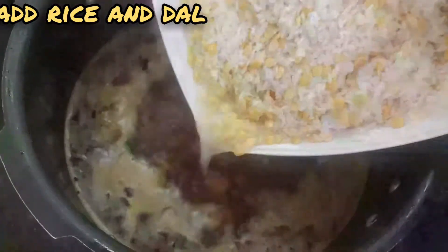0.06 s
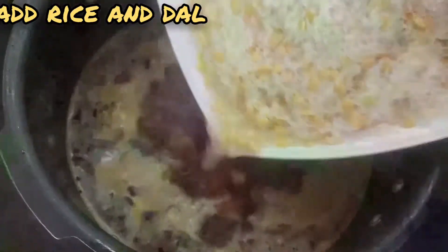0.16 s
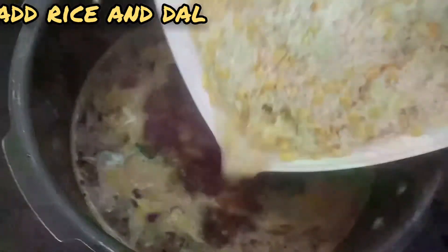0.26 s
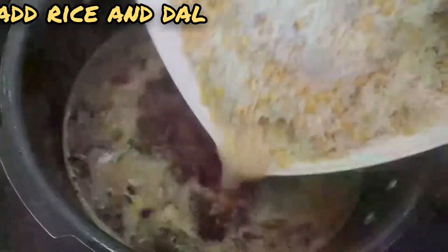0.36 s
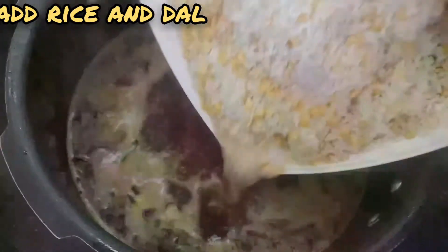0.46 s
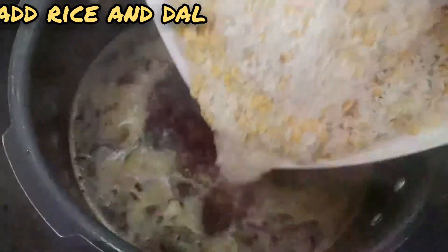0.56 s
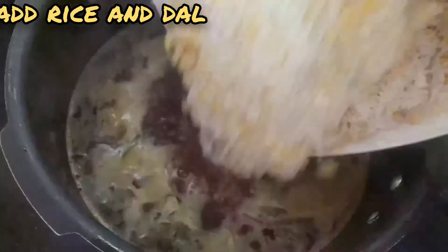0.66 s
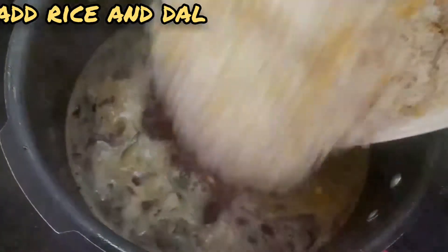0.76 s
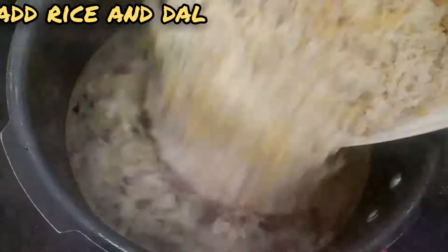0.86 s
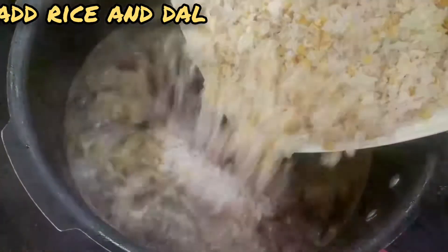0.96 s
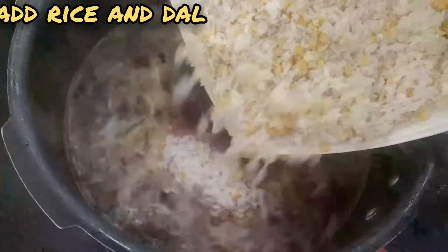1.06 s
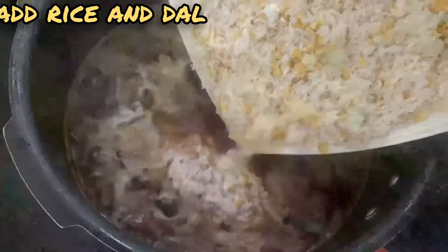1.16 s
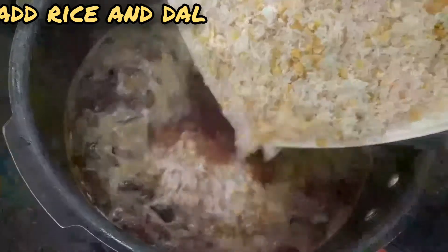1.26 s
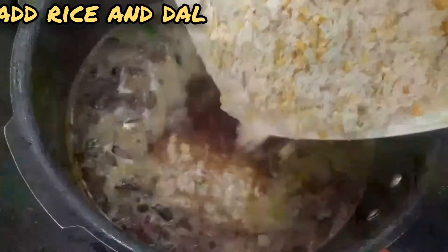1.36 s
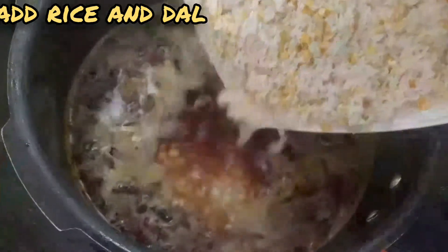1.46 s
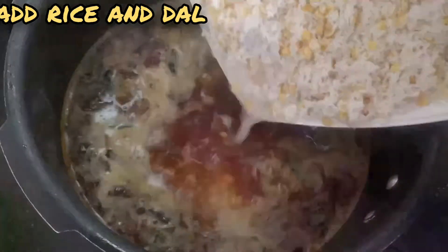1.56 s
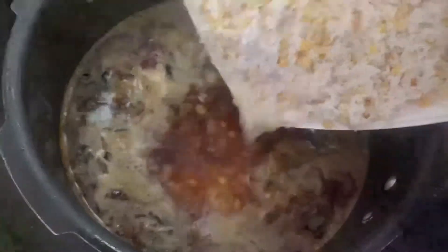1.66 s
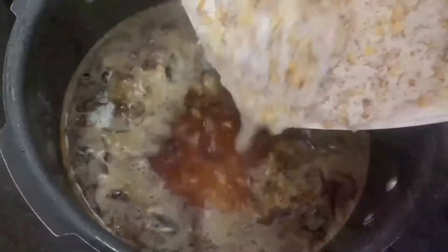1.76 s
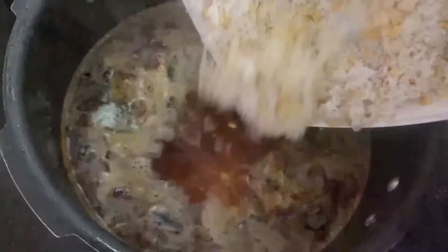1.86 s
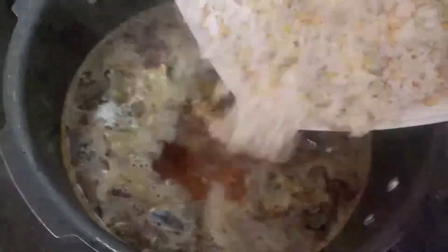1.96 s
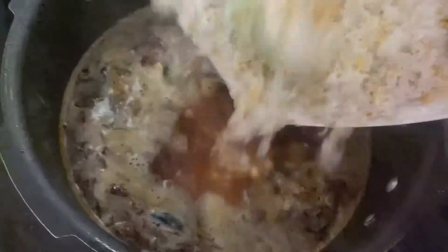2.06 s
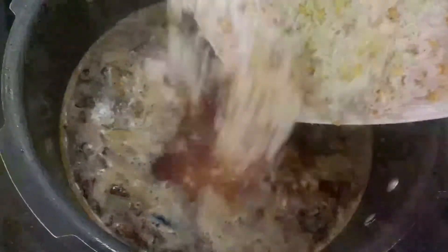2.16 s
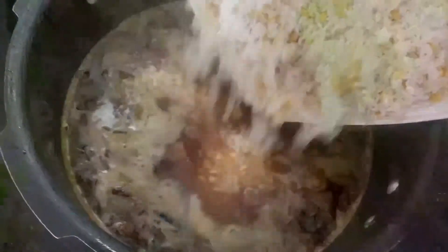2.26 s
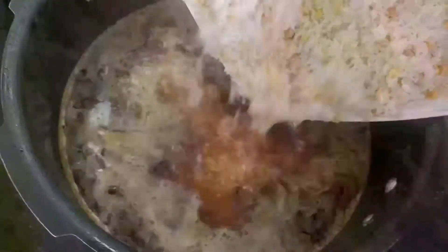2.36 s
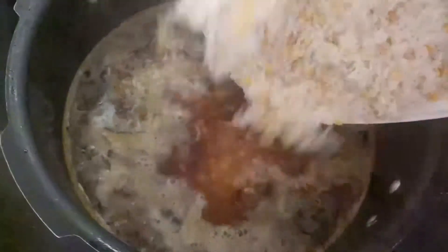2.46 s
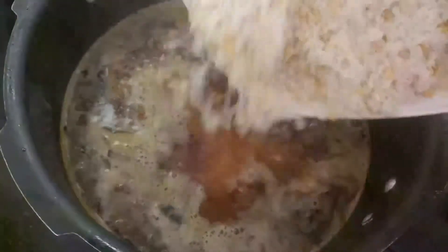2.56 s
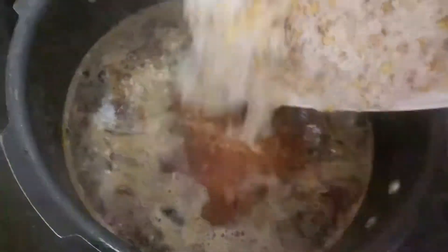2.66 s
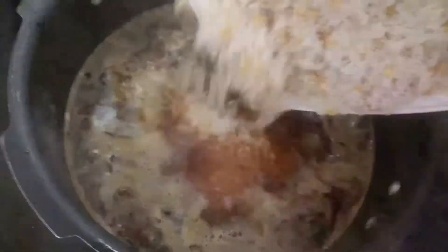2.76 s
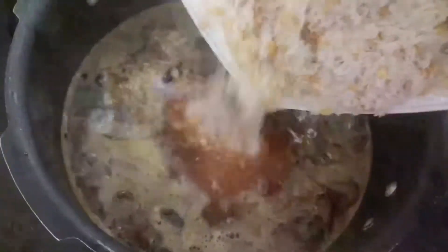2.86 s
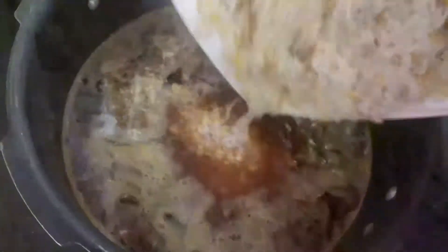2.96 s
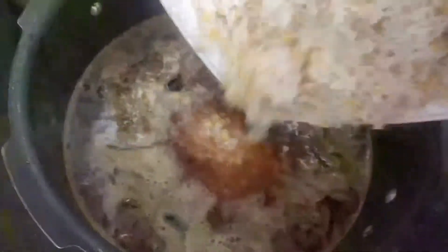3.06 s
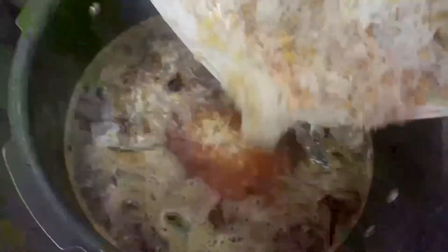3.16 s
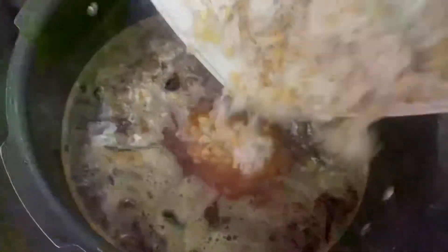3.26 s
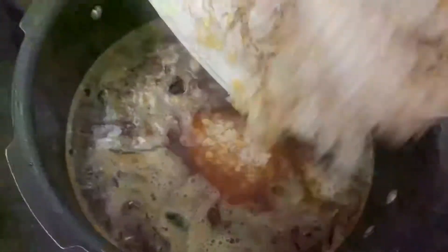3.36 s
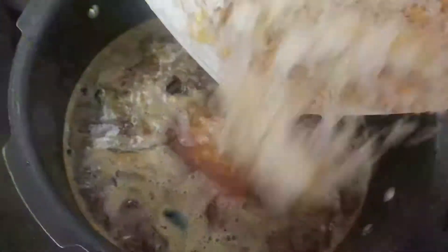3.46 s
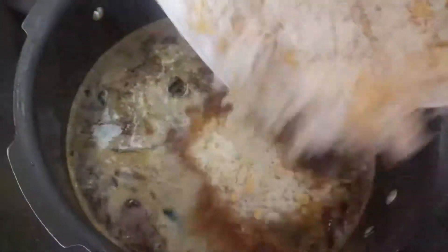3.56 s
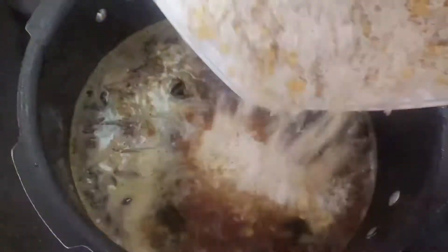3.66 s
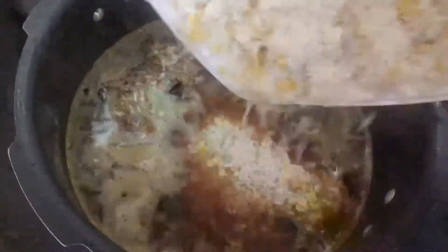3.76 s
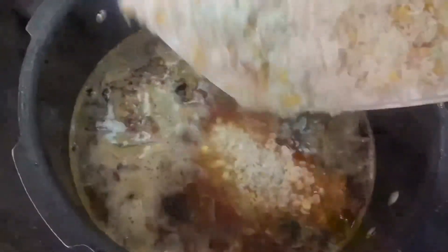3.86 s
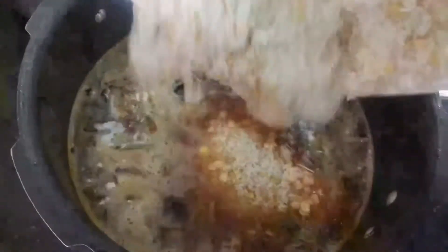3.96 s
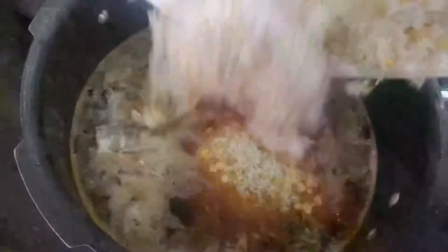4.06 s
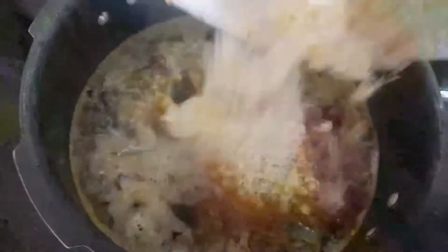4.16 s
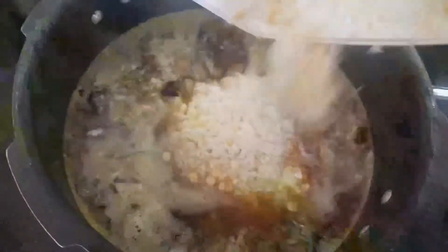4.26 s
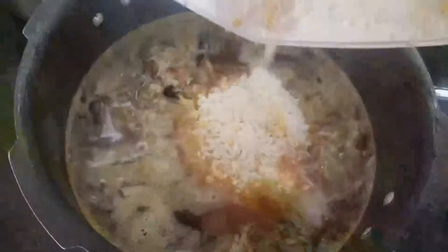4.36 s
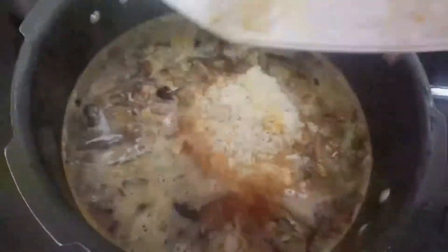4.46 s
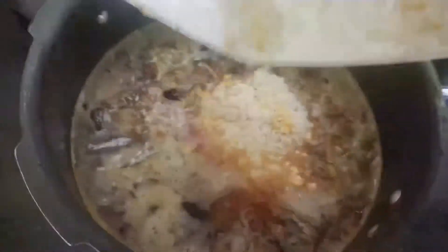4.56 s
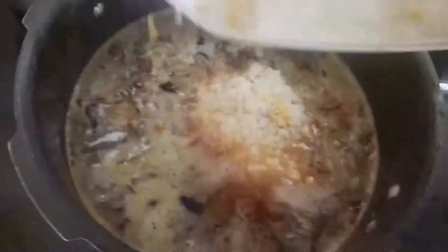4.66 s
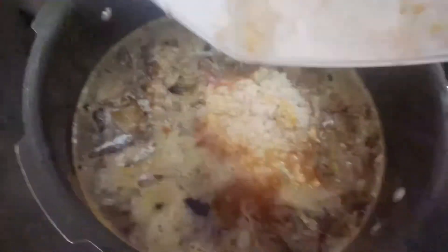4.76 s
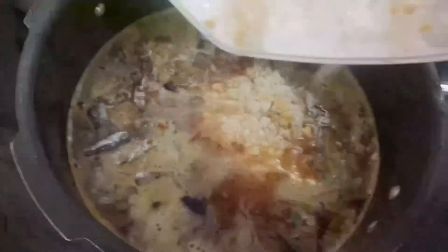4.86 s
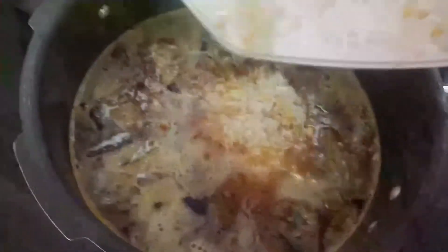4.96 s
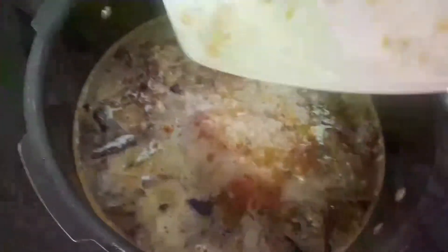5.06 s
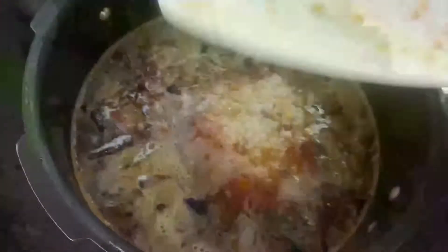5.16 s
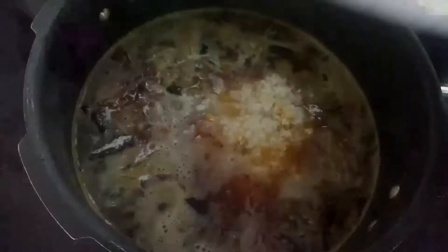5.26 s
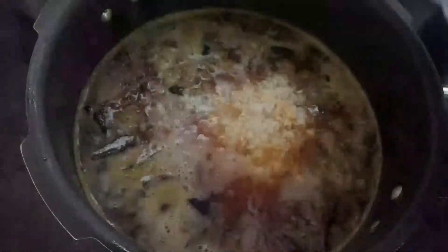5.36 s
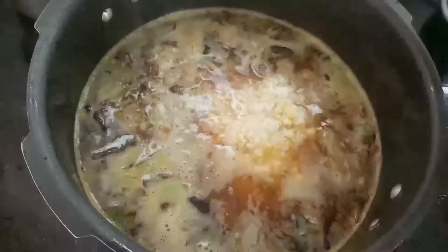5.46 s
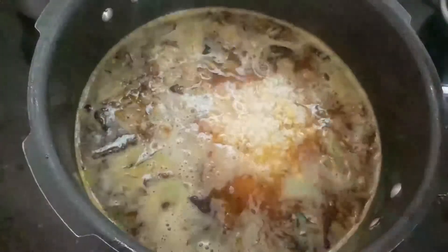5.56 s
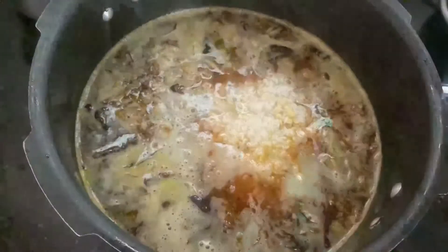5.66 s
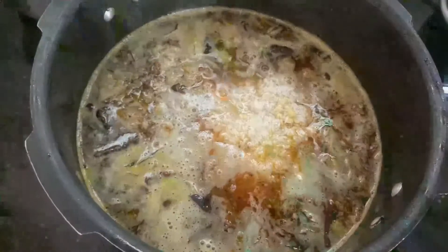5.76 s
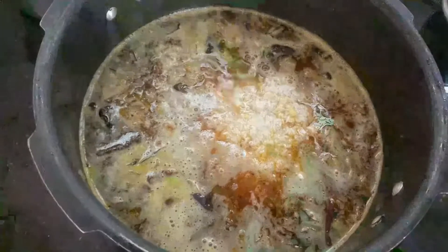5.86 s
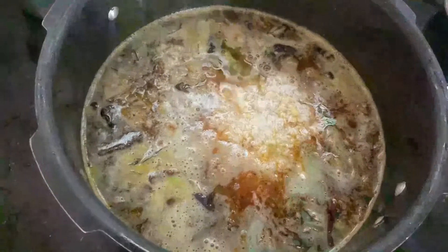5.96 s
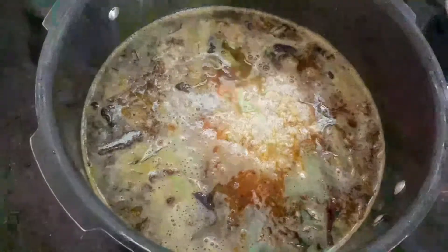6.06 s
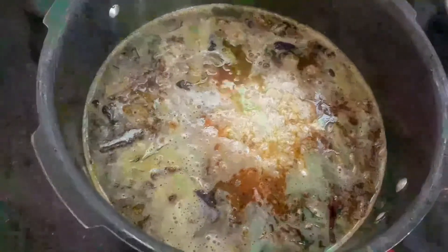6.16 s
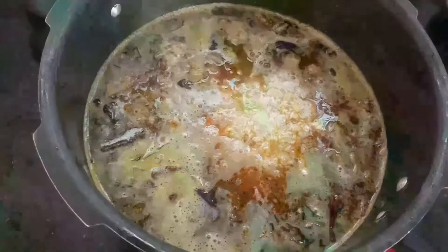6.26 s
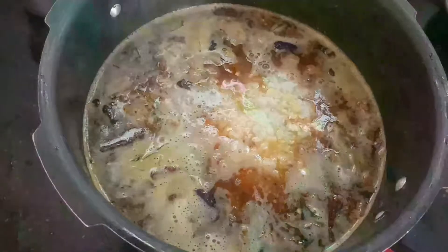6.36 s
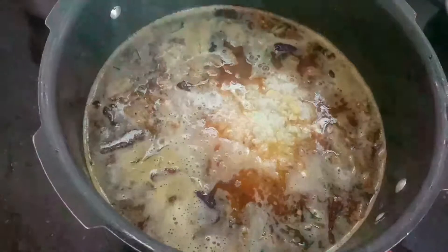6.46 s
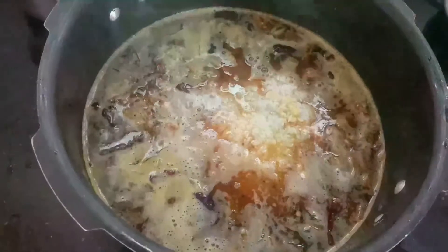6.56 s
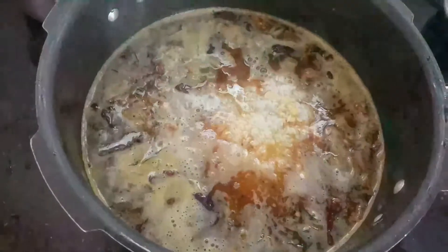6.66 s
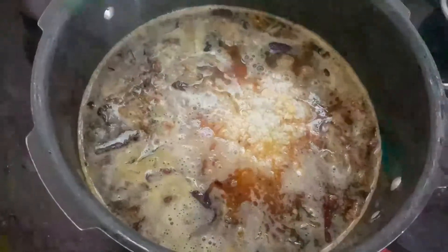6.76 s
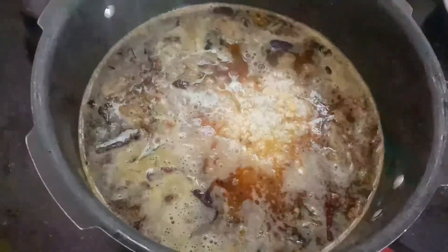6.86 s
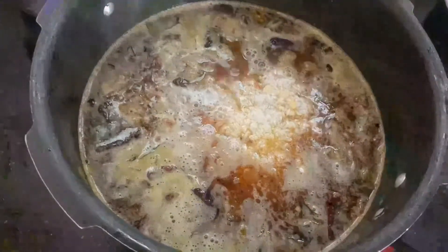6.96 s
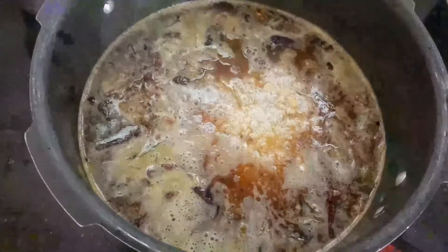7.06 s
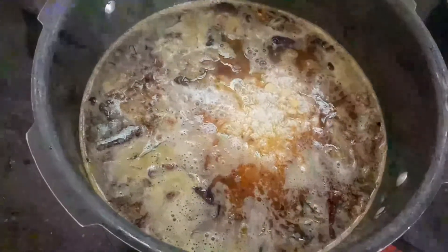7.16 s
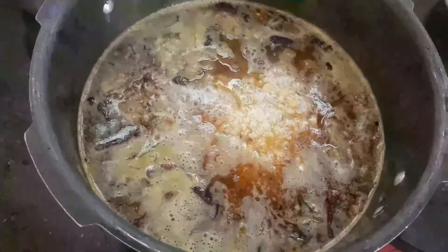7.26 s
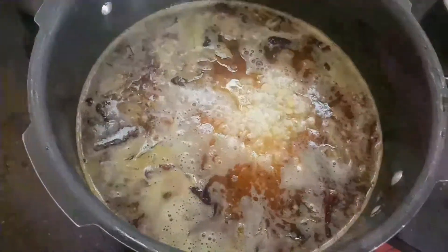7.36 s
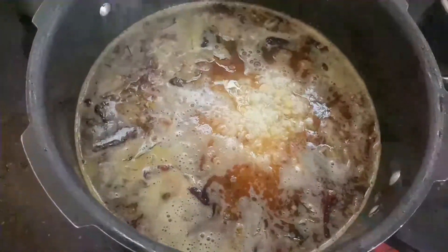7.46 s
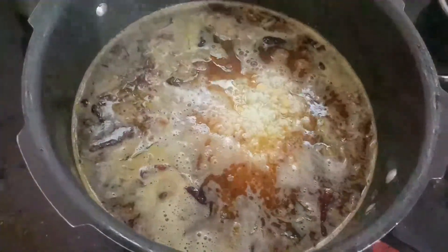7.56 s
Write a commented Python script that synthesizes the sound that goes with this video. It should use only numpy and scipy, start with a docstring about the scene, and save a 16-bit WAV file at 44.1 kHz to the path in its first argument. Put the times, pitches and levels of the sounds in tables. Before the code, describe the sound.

In a small tiled kitchen, close to a phone, wet rice and lentils patter into a simmering metal pot in uneven clumps with hiss, light splash and spray. Four sharp hand taps crack on the plastic tray, heavier rushes follow, and a softer tap comes once it is empty. Soft burner roar and bubbling remain until the tray slaps hard onto the counter, ringing briefly.

```python
"""In a small tiled kitchen, soaked rice and lentils slide off a plastic tray into a simmering steel pot.
Wet grains, random impacts ringing at many pitches, patter in clumps over hiss, splash and spray, close under a phone.
A hand taps the tray four times and once more when it is empty, as bursts of coloured noise with short resonances.
Then the tray is set down on the counter with a slap, a thud and ringing modes.
The burner and the kitchen hum underneath, made of noise in flickering bands, with bubbles and a thin whine."""
import sys
import numpy as np
from scipy import signal
from scipy.fft import rfft, irfft
from scipy.io import wavfile
from scipy.ndimage import uniform_filter1d

SR = 44100
rng = np.random.default_rng(int(sys.argv[2]) if len(sys.argv) > 2 else 0)


def persist_wave(psi):
    """Save psi, clipped to +-1, as 16-bit WAV."""
    counts = np.round(np.clip(psi, -1, 1) * 32767).astype(np.int16)
    wavfile.write(sys.argv[1], SR, np.atleast_2d(counts).T)


N = 335909  # length in samples
ROOM_T60_S, POT_T60_S = 0.32, 0.12


def undb(db):
    """Decibels to linear gain."""
    return 10 ** (np.asarray(db) / 20)


def level(x, db):
    """Set the RMS level in dB."""
    return x * undb(db) / np.sqrt(np.mean(x ** 2))


def colour(x, table, size=2048):
    """Causal filter whose gain follows (Hz, dB) points, from the folded cepstrum."""
    hz, db = np.transpose(table)
    f = np.maximum(np.arange(size // 2 + 1) * SR / size, 1)
    gain_db = np.interp(np.log(f), np.log(np.maximum(hz, 1)), db)
    cep = irfft(np.log(undb(gain_db)))
    # folding the cepstrum puts all the energy after the onset
    cep[1:size // 2] *= 2
    cep[size // 2 + 1:] = 0
    impulse = irfft(np.exp(rfft(cep)))
    return signal.fftconvolve(x, impulse)[:len(x)]


def peak(hz, width, skirt_db):
    """A broad resonance as (Hz, dB) points; width is a share of the centre."""
    low_side = [(hz / 8, skirt_db - 21.0), (hz / (1 + 2 * width), skirt_db)]
    high_side = [(hz * (1 + 2 * width), skirt_db), (hz * 8, skirt_db - 27.5)]
    return low_side + [(hz, 0)] + high_side


def walk(rate):
    """Random levels held 1 / rate s and slewed twice; spread near 1.4."""
    k = int(SR / rate)
    steps = np.repeat(rng.standard_normal(N // k + 1), k)
    return 1.9 * uniform_filter1d(uniform_filter1d(steps, k), k)[:N]


def fade(t60, t):
    """Exponential decay, down 60 dB after t60 seconds."""
    return np.exp(-np.log(1000) * t / t60)


def gate(t, start, end, swell, fall):
    """Gain 1 from start to end, 20 dB less one swell before and one fall after."""
    before, after = (start - t) / max(swell, .01), (t - end) / max(fall, .01)
    return undb(-20 * np.maximum(np.maximum(before, after), 0))


def add(out, s, x):
    """Mix a sound in at time s."""
    i = int(s * SR)
    out[i:i + len(x)] += x[:N - i]


def burst(table, t60, peak_db, t, rise=0.001115, blow=0.):
    """A coloured noise crack that swells and dies away; blow adds one clean push at the top of the swell."""
    shake = rng.standard_normal(len(t)) * fade(t60, t) * np.clip(t / rise, 0, 1) ** 2
    shake[int(rise * SR)] += blow * np.sqrt(np.sum(shake ** 2))
    # small things radiate no deep bass
    bass_cut = (table[0][0] / 4, table[0][1] - 36)
    x = colour(shake, [bass_cut] + list(table))
    # the peak is taken as three times the RMS of the opening
    opening = x[:int((rise + t60 / 8) * SR)]
    return x * undb(peak_db) / (3 * np.sqrt(np.mean(opening ** 2)))


def ring(modes, db, t):
    """Modes set going together by one blow; close pairs beat."""
    x = sum(undb(g) * np.sin(2 * np.pi * hz * t) * fade(t60, t) for hz, g, t60 in modes)
    return undb(db) * x * np.clip(t / 0.0019, 0, 1)


def room(x, wet_db, t60=ROOM_T60_S):
    """The small tiled kitchen, or the pot, answers with a dense short tail."""
    t = np.arange(int(.45 * SR)) / SR
    tail = rng.standard_normal(len(t)) * fade(t60, t) * np.clip(t / 0.0015, 0, 1)
    tail = tail / np.sqrt(np.sum(tail ** 2))
    return x + undb(wet_db) * signal.fftconvolve(x, tail)[:N]


def grains(rate, spread_db, clump_db, clump_rate):
    """Random impacts of spread-out sizes, rate per second, swelling in clumps."""
    hit = rng.random(N) < rate / SR
    size = undb(spread_db * np.minimum(rng.exponential(size=N), 3)) * rng.uniform(-1, 1, N)
    return hit * size * undb(clump_db * walk(clump_rate))


def pings(lo_hz, hi_hz, rate, width, clump_db, clump_rate, count=9):
    """Grains or bubbles of many sizes: each size rings a few cycles at its own pitch and clumps on its own."""
    out = 0
    for hz in np.geomspace(lo_hz, hi_hz, count):
        struck = colour(grains(rate, 1.6, clump_db, clump_rate), peak(hz, width, -9.5))
        out = out + level(struck, 0) * np.sqrt(hz / hi_hz)
    return out


# Tone of the burner's roar. Each row: frequency in Hz, relative level in dB per Hz.
ROAR_TONE = [(15, -20), (25, -9), (54, -5.5), (105, -11.5), (140, -1.5), (170, -14), (218, -12.5),
             (280, -11.5), (341, -5.5), (390, -12), (600, -15), (750, -21), (950, -18.5), (1220, -23.5),
             (1500, -54), (2500, -57)]
# Tone of the air. Each row: frequency in Hz, relative level in dB per Hz.
AIR_TONE = [(900, -25), (1400, -1), (2300, 0), (3400, -5), (4200, -3), (5500, -5), (8000, -5), (9900, -20),
            (12500, -14), (16000, -14)]
# Swell of the flame, heard against its own mean. Each row: time in seconds, level in dB.
FLAME_SWELL = [(0.0, -59), (0.87, -53.5), (1.72, -55), (2.37, -54), (3.4, -59.5), (4.11, -53),
               (4.65, -57.5), (5.0, -54), (6.07, -55.5), (6.77, -59), (7.0, -52.5), (7.21, -65.5),
               (7.49, -53.5), (7.62, -58.5)]
ROAR_DB, AIR_DB = -55, -63  # RMS before swell and flicker
WHINE_HZ, WHINE_DB = 14700, -84  # RMS before it wavers
FIZZ_DB, FIZZ_START_S, FIZZ_END_S = -63.5, 5.73, 5.86  # the broth fizzes up round the heap for a moment


def kitchen():
    """Flame roar and air in bands that flicker alone, simmer fizz and bubbles, and a thin wavering whine."""
    t, f = np.arange(N) / SR, np.arange(N // 2 + 1) * SR / N
    roar = level(colour(rng.standard_normal(N), ROAR_TONE, size=8192), ROAR_DB)
    air = level(colour(rng.standard_normal(N), AIR_TONE), AIR_DB)
    spec = rfft(roar + air)

    s, roar_db = np.transpose(FLAME_SWELL)
    swell_db = np.interp(t, s, roar_db - roar_db.mean())
    bed, flicker_db, drift_db = 0, 1.3, 0.7
    for lo in 16 * 2 ** np.arange(0, 10, .5):  # half-octave bands
        band = irfft(spec * (f >= lo) * (f < lo * np.sqrt(2)), N)
        flame_db = swell_db * np.clip(1500.0 / lo, 0, 1)  # the flame moves the bass most
        bed = bed + band * undb(flame_db + flicker_db * walk(9.) + drift_db * walk(1.445))

    fizz = room(pings(3760., 10300., 300., 0.3, 2.5, 14.), -1.9)
    fizz = level(colour(fizz, PATTER_TONE[:-2] + SPRAY_TONE[1:]), -1.5)
    fizz = fizz * undb(FIZZ_DB) * gate(t, FIZZ_START_S, FIZZ_END_S, 0.3, 0.58)
    bubbles = level(room(pings(550., 1300., 80., .12, 1.2, 6., count=7), -3.0), -66.5)
    whine = colour(rng.standard_normal(N), peak(WHINE_HZ, .002, -60.0), size=8192)
    whine = level(whine, WHINE_DB) * undb(4.0 * walk(2.5))
    return bed + fizz + bubbles + whine


# Tray and counter contacts. Each row: start in seconds, slap level in dB, thud level in dB before trim,
# thud t60 in seconds, softness in dB per octave above 300 Hz, tray ring in dB, counter ring in dB.
TRAY_LANDINGS = [(1.1751, -68, -46, 0.055, 9, -70, -48), (6.8831, -34, -23, 0.19, -1, -59, -29),
                 (7.0502, -6, -17.5, 0.22, 5.5, -17, -28.5), (7.3809, -57, -45, 0.18, 5, -56, -36),
                 (7.409, -70, -48, 0.093, 3, -66, -40)]
# Tone of the counter thud. Each row: frequency in Hz, relative level in dB per Hz.
COUNTER_TONE = [(41, -46), (70, -15.5), (172, -16), (255, -12), (366, -9), (410, -13.5), (607, -4.5),
                (992, -13), (1150, -13), (1680, -25), (1940, -15), (2180, -24.5), (3500, -30), (4550, -63),
                (7700, -120)]
# Tone of the tray's slap. Each row: frequency in Hz, relative level in dB per Hz.
SLAP_TONE = [(120, -37), (200, -1.5), (683, -22), (851, 5.5), (986, -7.5), (2050, -11), (2250, -11),
             (3690, -10), (4680, -18), (8120, -20), (13300, -40.5), (16000, -73)]
# Ringing modes of the counter. Each row: frequency in Hz, relative level in dB, t60 in seconds.
COUNTER_RING = [(126.2, -12, 0.57), (235.7, 1, 0.33), (282, 1, 0.19), (332, 2.5, 0.18), (405, -9, 0.13)]
# Ringing modes of the empty tray. Each row: frequency in Hz, relative level in dB, t60 in seconds.
TRAY_RING = [(836, -5.5, 0.36), (866, -5, 0.2), (929, -9, 0.26), (940, -15, 0.059), (1434, 4, 0.05),
             (1634, -5, 0.12), (2060, -7, 0.18), (2710, -12.5, 0.13), (3150, -7, 0.1), (3730, -18, 0.038),
             (8200, -10.5, 0.18)]


def knocks():
    """The counter thuds, the empty tray slaps and rings, and the room carries it on."""
    out, rings, t = np.zeros(N), np.zeros(N), np.arange(int(.5 * SR)) / SR
    for s, slap_db, thud_db, thud_t60, soft_db, tray_db, counter_db in TRAY_LANDINGS:
        # a softer landing loses the upper part of the thud
        body = [(hz, db - soft_db * max(np.log2(hz / 300.0), 0)) for hz, db in COUNTER_TONE]
        contact = burst(peak(870.0, 1.0, -3.0), 0.016, thud_db - soft_db, t, rise=0.00115, blow=0.41)
        thud = burst(body, thud_t60, thud_db + 3.5, t, rise=0.002916, blow=0.3)
        slap = burst(SLAP_TONE, 0.16, slap_db, t, rise=0.002)
        add(out, s, contact + thud + slap)
        add(rings, s, ring(COUNTER_RING, counter_db, t) + ring(TRAY_RING, tray_db, t))
    return room(out, -7.5) + room(rings, -12.0)


# Hand on the tray. Each row: start in seconds, crack level in dB, low thump level in dB, thump Hz,
# thump t60 in seconds, mid clack level in dB, clack Hz, clack t60 in seconds, rim click level in dB, rim Hz,
# pot boom level in dB, length in seconds of the hiss before; thump, clack and boom levels are before trim.
TRAY_TAPS = [(1.602, -14.5, -25, 454, 0.039, -27.5, 770, 0.14, -27, 3020, -44, 0.017),
             (1.8726, -9.5, -22, 437, 0.041, -18.5, 840, 0.057, -14, 3450, -43, 0.021),
             (2.2169, -6.5, -39, 364, 0.18, -16.5, 990, 0.028, -10.5, 3090, -40.5, 0.022),
             (2.4947, -8.5, -62, 313, 0.025, -21, 1600, 0.064, -16, 2100, -42, 0.022),
             (4.862, -25.5, -70, 403, 0.025, -38, 3260, 0.031, -27, 2360, -70, 0.026)]
# Tone of the crack and of the hiss before it. Each row: frequency in Hz, relative level in dB per Hz.
CRACK_TONE = [(710, -2.5), (1200, -2), (2400, -4), (3150, 4.5), (5780, -2), (8080, -4.5), (9510, -17),
              (10400, -20), (16000, -92)]


def taps():
    """The tray clacks short and dull while the pot booms slower; a short hiss swells into each blow."""
    out, t = np.zeros(N), np.arange(int(.3 * SR)) / SR
    pot = [(90, -54), (130, -7.0), (200, -3.5), (340, -3.5), (600, -30.5)]  # (Hz, dB per Hz)
    for row in TRAY_TAPS:
        s, crack_db, low_db, low_hz, low_t60, mid_db, mid_hz, mid_t60, rim_db, rim_hz, boom_db, lead_s = row
        thump = burst(peak(low_hz, 0.23, -20.5), low_t60, low_db + 7.0, t, blow=1.0)
        clack = burst(peak(mid_hz, .22, -9.0), mid_t60, mid_db + 7.0, t, blow=1.5)
        boom = burst(pot, 0.16, boom_db + 10.0, t, rise=0.0107)
        rim = burst(peak(rim_hz, 0.053, -18.0), 0.018, rim_db, t, rise=0.002083, blow=0.96)
        crack = burst(CRACK_TONE, 0.02, crack_db, t, rise=0.002)
        add(out, s, thump + clack + rim + boom + crack)
        lead = t[:int((lead_s + .002) * SR)]
        add(out, s - lead_s, burst(CRACK_TONE, 0.79, crack_db - 13.5, lead, rise=0.53 * lead_s))
    return room(out, -10.5)


# Single grains and drops. Each row: time in seconds, level in dB before trim, pitch in Hz.
LOUD_GRAINS = [(0.0178, -28, 2530), (0.092, -51, 6000), (0.204, -44, 4000), (0.2618, -30.5, 4700),
               (0.4035, -31, 4400), (0.617, -33, 3900), (0.6315, -25.5, 2200), (0.6558, -28.5, 2130),
               (0.6857, -33, 7570), (0.712, -46, 5000), (0.7346, -30, 2360), (0.7705, -27, 4100),
               (0.9182, -40, 5370), (0.9431, -37, 8300), (0.828, -26, 7300), (0.968, -35, 6000),
               (1.005, -44, 5000), (1.022, -33, 6500), (1.12, -42, 4850), (1.335, -30.5, 2380),
               (1.3538, -24.5, 4480), (1.4646, -30.5, 2680), (1.525, -47, 5600), (1.5716, -31, 3000),
               (1.8108, -28, 9300), (2.017, -23.5, 7100), (2.0474, -29, 7640), (2.1058, -26.5, 7400),
               (2.413, -32, 7500), (2.5506, -21, 7560), (2.6893, -28, 7950), (2.7166, -18, 8250),
               (2.9027, -24, 5950), (3.03, -42, 6500), (3.046, -37, 2600), (3.064, -41.5, 6040),
               (3.242, -24.5, 7560), (3.298, -31, 7850), (3.469, -28, 7600), (3.5086, -17, 3740),
               (3.615, -29, 6800), (3.6432, -32, 4500), (3.7204, -24, 4900), (3.8212, -31.5, 4960),
               (3.867, -35.5, 4500), (3.93, -26, 3370), (3.968, -37, 7500), (3.9847, -30, 3130),
               (4.0097, -28.5, 3100), (4.0706, -33, 6500), (4.091, -29, 5000), (4.108, -22, 7800),
               (4.132, -24, 5000), (4.147, -31, 7700), (4.1748, -20.5, 4680), (4.205, -27, 7840),
               (4.232, -38, 8200), (4.321, -30, 8020), (4.2946, -32, 8140), (4.3375, -25, 7800),
               (4.4035, -32.5, 7700), (4.5025, -33.5, 4400), (4.535, -43, 7550), (4.606, -39, 7000),
               (4.681, -44, 7800), (4.731, -45, 6000), (4.775, -43, 8000), (4.798, -41, 5300),
               (4.6374, -37.5, 7700), (4.8094, -37.5, 8500), (4.9773, -31.5, 4460), (4.9768, -34, 7960),
               (5.695, -41, 5700), (5.733, -37, 2850), (5.78, -49, 3000), (5.843, -46, 8000),
               (5.927, -46, 8300), (6.095, -45.5, 7000)]
# Shared tone of a grain's click. Each row: frequency in Hz, relative level in dB per Hz.
CLICK_TONE = [(1500, -28), (2500, -24), (5000, 1.5), (8300, 4), (10000, -33), (16000, -32)]
CLICK_T60_S, PING_T60_S = 0.041, 0.019
STRAY_PER_S, STRAY_DB, STRAY_END_S = 6.7, -45, 4.5  # lone grains until the tray is bare; lowest dB before trim


def ticks():
    """Each single grain is a dry click with most weight near its own pitch, answered by the pot."""
    out, t = np.zeros(N), np.arange(int(.1 * SR)) / SR
    rise = .0035  # seconds; a wet grain lands softly
    chance = rng.random((int(STRAY_PER_S * STRAY_END_S), 3))
    stray = [(0.0083 + a * STRAY_END_S, STRAY_DB + 5.6 * b, 2100 * 4 ** c) for a, b, c in chance]
    for s, db, hz in list(LOUD_GRAINS) + stray:
        ping = burst(peak(hz, .12, -14.0), PING_T60_S, db - 4.0, t, rise=rise)
        click = burst(CLICK_TONE, CLICK_T60_S, db - 13.0, t, rise=rise)
        add(out, s - 0.69 * rise, ping + click)
    return colour(room(out, -8, POT_T60_S), [(8800, 0), (10000, -9), (16000, -12)])


# Loads of grain sliding off. Each row: start of full flow in seconds, hold in seconds, patter level in dB,
# splash level in dB, spray level in dB, swell in seconds, fade in seconds; swell and fade span 20 dB.
GRAIN_LOADS = [(0.0, 0, -51, -43, -53, 0.1, 0.053), (0.276, 0.0, -58, -60, -55, 0.12, 0.33),
               (0.41, 0.0, -47.5, -54, -52.5, 0.2, 0.16), (0.81, 0.032, -36, -45.5, -50.5, 0.27, 0.19),
               (0.93, 0.096, -39.5, -57, -50.5, 0.23, 0.08), (1.126, 0, -45.5, -52.5, -64, 0.09, 0.35),
               (1.802, 0.16, -55.5, -59.5, -57, 0.21, 0.1), (1.91, 0.067, -39.5, -58, -54, 0.18, 0.38),
               (2.191, 0.043, -34.5, -46, -47, 0.077, 0.17), (2.33, 0.051, -41.5, -58, -51, 0.063, 0.085),
               (2.529, 0, -34.5, -46.5, -50, 0.14, 0.14), (2.62, 0.0038, -38, -66, -50, 0.13, 0.051),
               (2.71, 0, -39, -62, -41, 0.039, 0.1), (2.74, 0.036, -39, -54.5, -58, 0.16, 0.46),
               (2.89, 0, -43.5, -65, -48, 0.059, 0.071), (2.965, 0.0072, -42, -65, -60, 0.05, 0.035),
               (3.29, 0.0039, -43.5, -60, -64, 0.2, 0.031), (3.439, 0.026, -41.5, -54, -67, 0.19, 0.1),
               (3.512, 0.021, -29.5, -54, -43.5, 0.067, 0.11), (3.6, 0.062, -40, -54.5, -69, 0.18, 0.1),
               (3.68, 0.019, -32, -51.5, -45, 0.068, 0.092), (3.96, 0.017, -43.5, -50, -62, 0.063, 0.29),
               (4.09, 0.13, -33.5, -49.5, -45.5, 0.15, 0.13), (4.299, 0.019, -40, -53.5, -52, 0.08, 0.14),
               (4.501, 0.089, -69, -85, -77, 0.016, 0.14)]
# Thin trickle between loads. Each row: start in seconds, end in seconds.
THIN_TRICKLES = [(0.0, 1.6), (3.17, 3.85)]
TRICKLE_DB, TRICKLE_SPLASH_DB, TRICKLE_SPRAY_DB = -53.5, -62, -62


def flow(t):
    """Gains of patter, splash and spray: every load swells, holds and fades over the trickle."""
    trickle = sum(gate(t, a, b, 0.088, 0.079) ** 2 for a, b in THIN_TRICKLES)
    power = undb([[TRICKLE_DB], [TRICKLE_SPLASH_DB], [TRICKLE_SPRAY_DB]]) ** 2 * trickle
    for s, held, patter_db, splash_db, spray_db, swell, fall in GRAIN_LOADS:
        load = undb([[patter_db], [splash_db], [spray_db]]) * gate(t, s, s + max(held, 0), swell, fall)
        power = power + load ** 2
    return np.sqrt(power)


# Tone of grains on broth and heap. Each row: frequency in Hz, relative level in dB per Hz.
PATTER_TONE = [(880, -41), (1500, -15), (2300, 5), (2940, -2), (3840, 3), (4830, 3), (6560, 0.5), (7840, 2),
               (8800, 0), (10500, -24), (16000, -38)]
# Tone of clumps hitting the broth. Each row: frequency in Hz, relative level in dB per Hz.
SPLASH_TONE = [(250, -23), (450, 1), (700, -1), (1000, -1), (1400, -6.5), (2000, -4.5), (2600, -6.5),
               (4000, -52)]
# Tone of the fine spray on top. Each row: frequency in Hz, relative level in dB per Hz.
SPRAY_TONE = [(7000, -47.5), (9300, -11.5), (12500, -3), (16000, -7)]


def pour():
    """Grains click and ping on broth and heap over a wet hiss; clumps splash lower, fine spray sits on top."""
    clicks = level(grains(2000., 2.0, 2.5, 90.), -3.5)
    tones = level(pings(2870.0, 8470.0, 250., 0.08, 2., 30., count=8), 0)
    hiss = level(rng.standard_normal(N), -4)
    clumps = undb(1.2 * walk(60.))
    wet = room((clicks + tones) * clumps, -8) + hiss
    patter = level(colour(wet, PATTER_TONE), -2.9)
    splash = level(colour(room(grains(900., 4.0, 1.66, 29.97), 6.7), SPLASH_TONE), 1.3)
    spray = level(colour(wet, SPRAY_TONE), 0)
    patter_gain, splash_gain, spray_gain = flow(np.arange(N) / SR)
    return patter * patter_gain + splash * splash_gain + spray * spray_gain


# Stereo width of blows and single grains. Each row: frequency in Hz, side minus mid in dB.
HIT_WIDTH = [(100, -31), (500, -50), (1000, -34), (3000, -36), (5000, -23), (16000, -13)]


def scene():
    """Almost mono; only blows and single grains sound wider, mostly in the treble."""
    hits = taps() + knocks() + ticks()
    mid = pour() + hits + kitchen()
    scatter = rng.standard_normal(200) * np.hanning(200)
    scatter = scatter / np.sqrt(np.sum(scatter ** 2))
    side = colour(signal.fftconvolve(hits, scatter)[:N], HIT_WIDTH)
    return np.array([mid + side, mid - side])


# Treble response of the phone's microphone. Each row: frequency in Hz, gain in dB.
MIC_RESPONSE = [(7000, 1), (8500, 3.5), (9000, -3), (11000, 1), (13000, 1)]
LOW_HZ, TOP_HZ = 43.3, 15850  # edges of what the phone passes


def record(dry):
    """The phone thins the deep bass, lifts the treble near 8.5 kHz and dips it at 9 kHz, rounds loud peaks and
    cuts the top."""
    high_pass = signal.butter(2, LOW_HZ, "high", fs=SR, output="sos")
    thin = signal.sosfilt(high_pass, [colour(c, MIC_RESPONSE) for c in dry])
    rounded = 1.5 * np.tanh(thin / 1.5)
    return signal.sosfilt(signal.ellip(10, .2, 80, TOP_HZ, fs=SR, output="sos"), rounded)


dry = scene()
out = record(dry)
persist_wave(out)
```